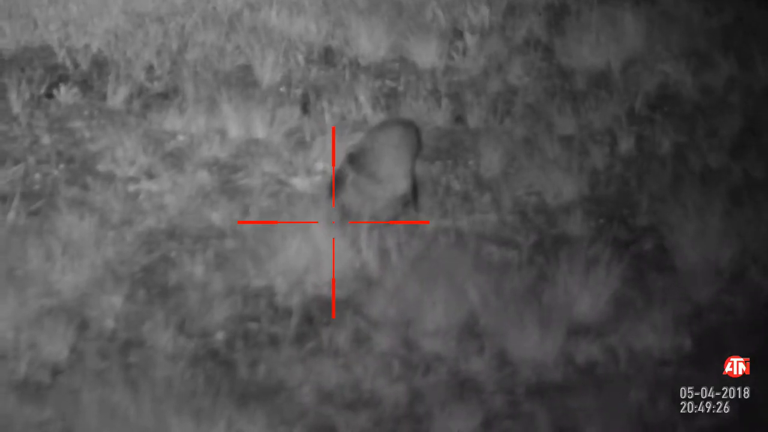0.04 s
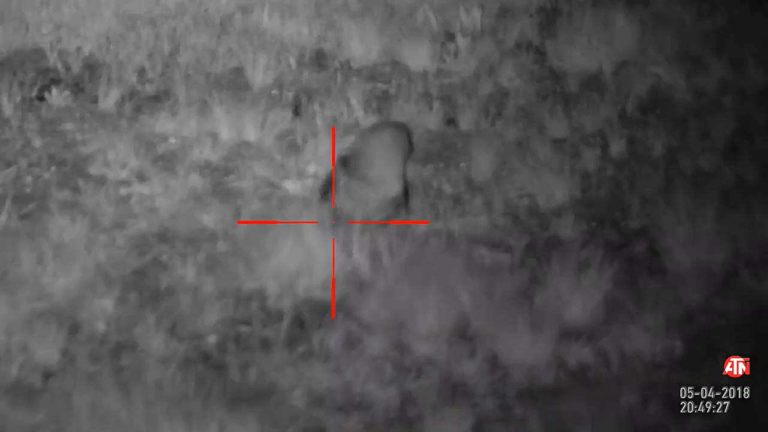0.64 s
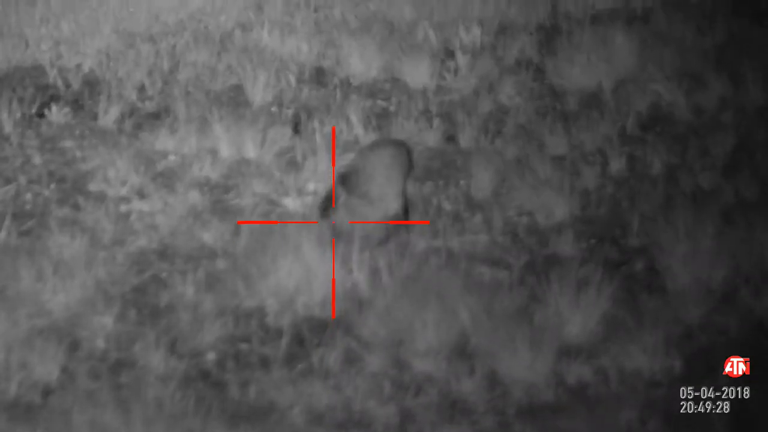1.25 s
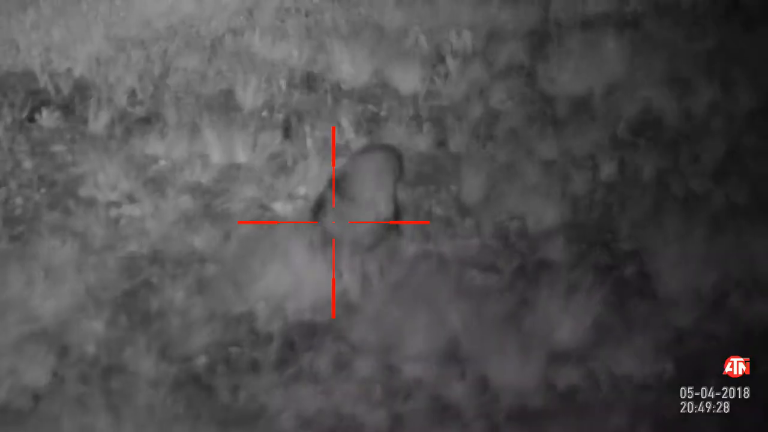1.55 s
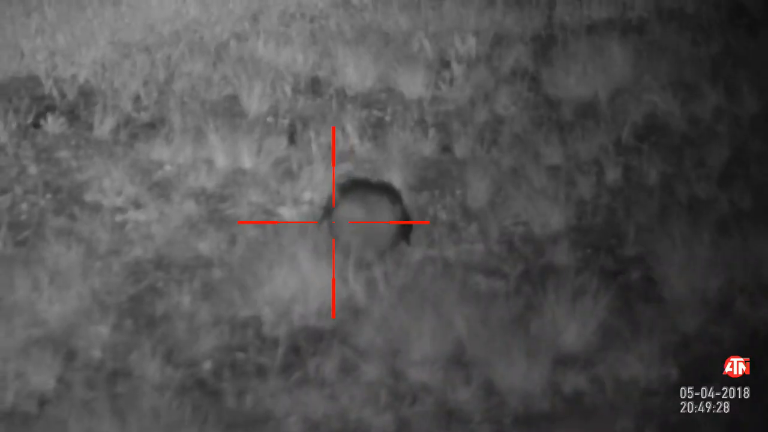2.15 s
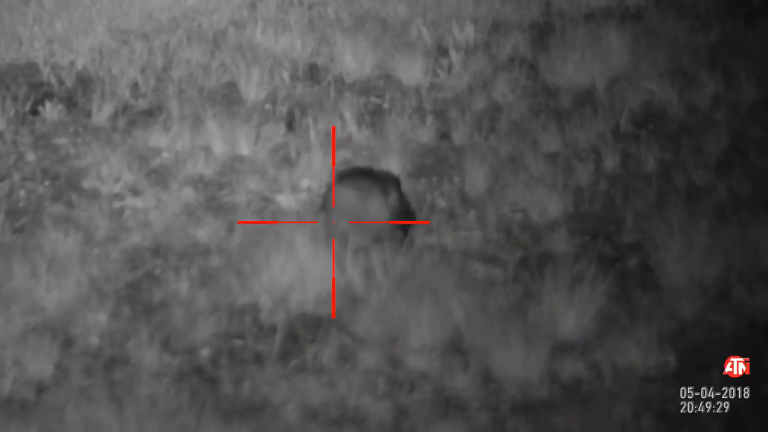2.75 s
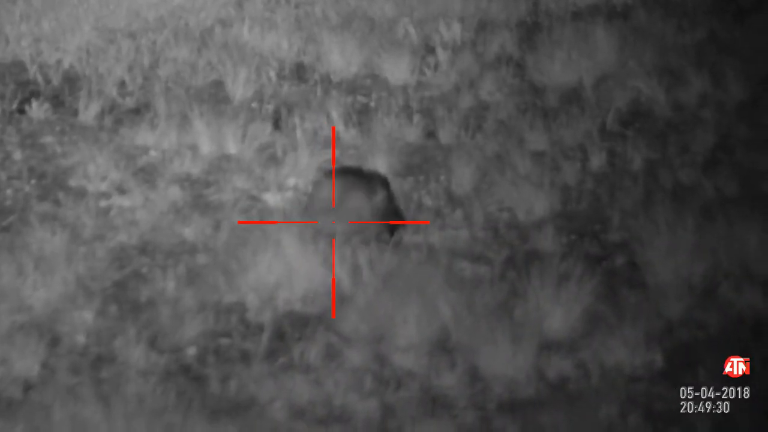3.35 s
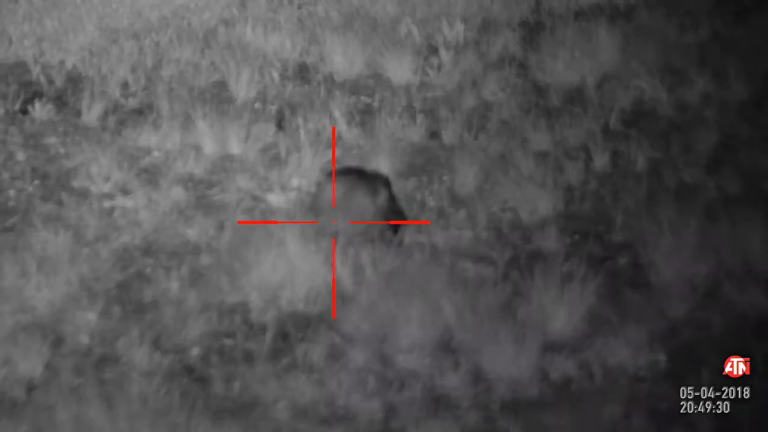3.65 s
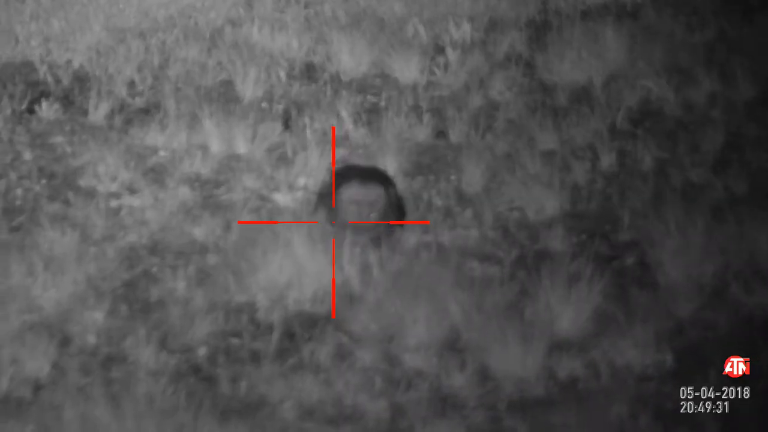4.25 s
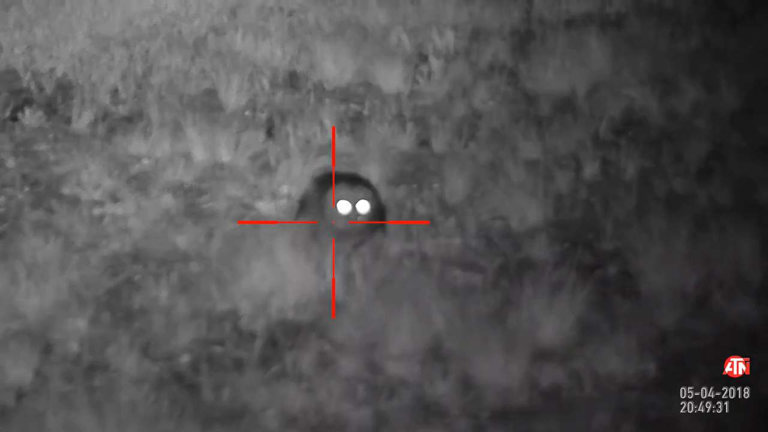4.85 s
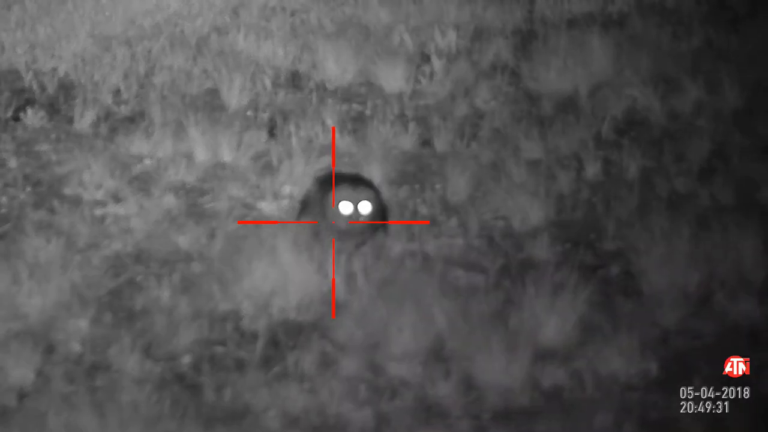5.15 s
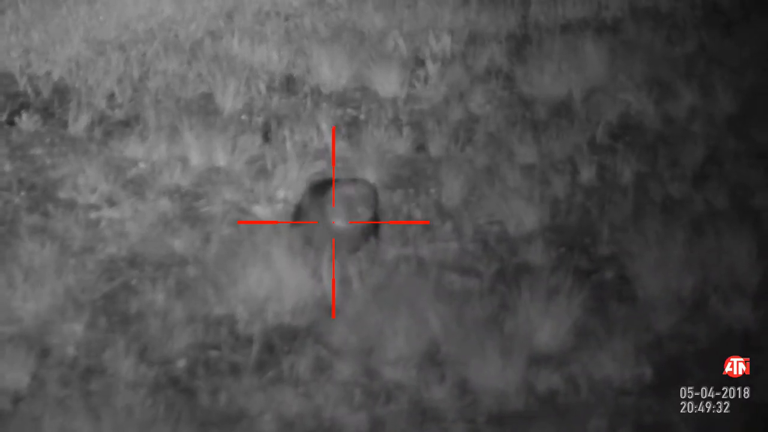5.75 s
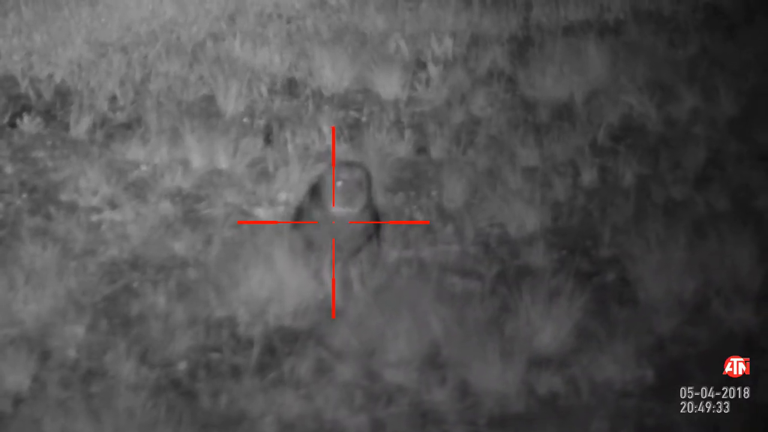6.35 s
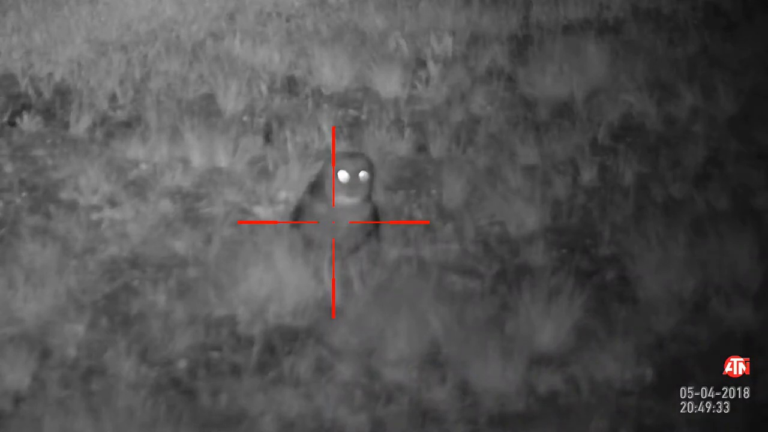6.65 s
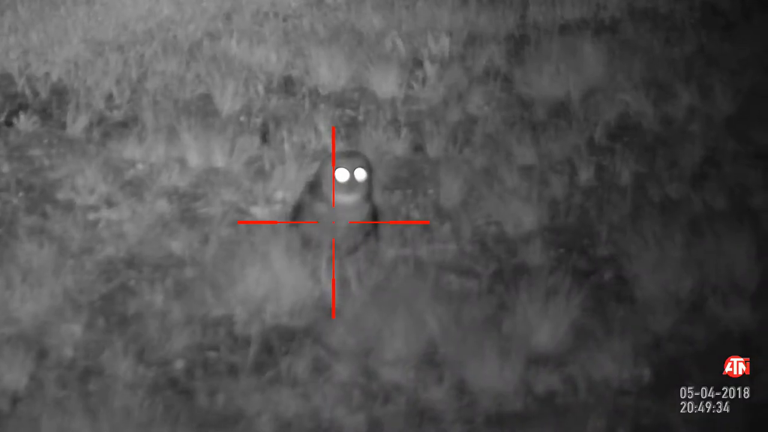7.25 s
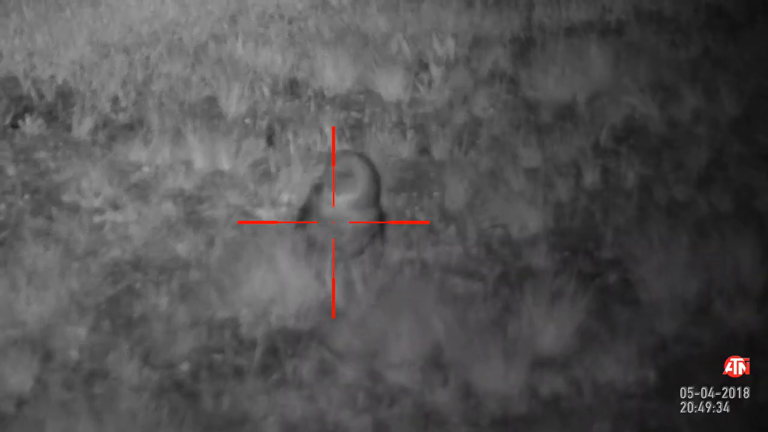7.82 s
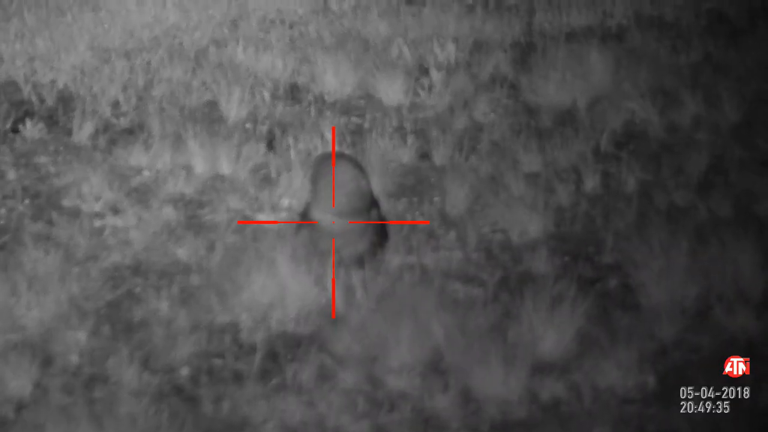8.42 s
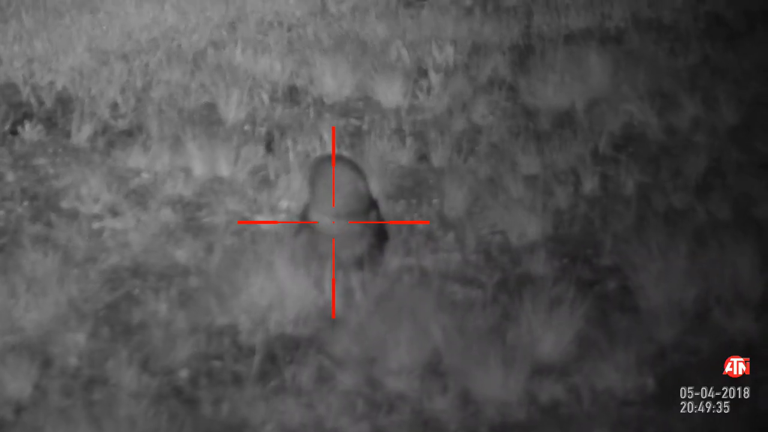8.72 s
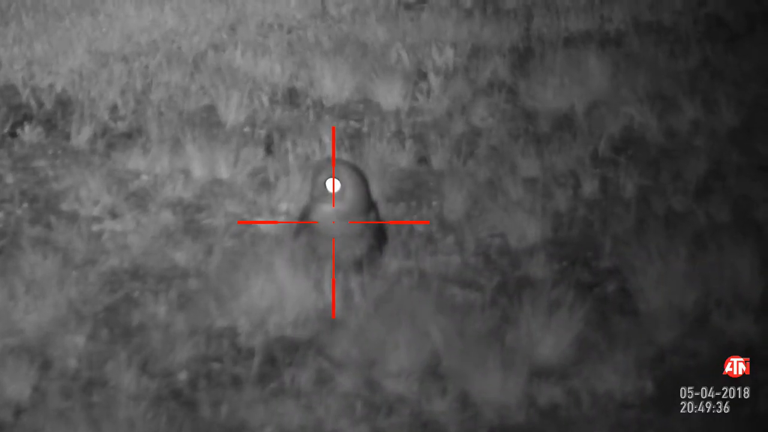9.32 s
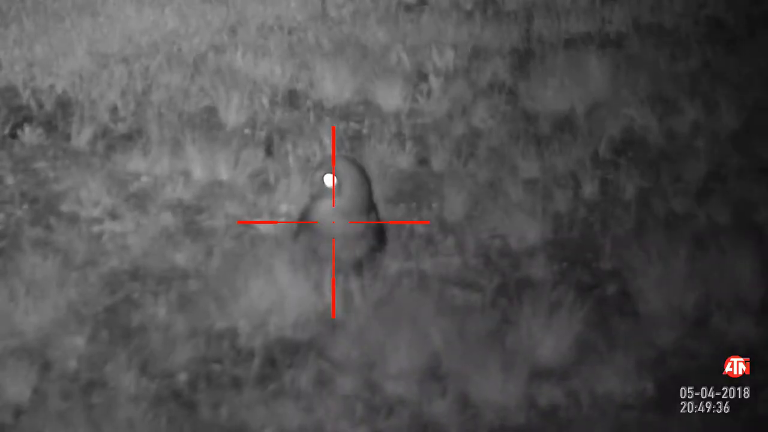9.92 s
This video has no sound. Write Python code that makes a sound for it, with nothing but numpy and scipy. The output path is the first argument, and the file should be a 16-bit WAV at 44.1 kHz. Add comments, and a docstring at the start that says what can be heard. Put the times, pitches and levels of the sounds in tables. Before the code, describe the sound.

Outdoors at night, many frogs call together from start to finish. Several high, whistled peeps sound each second over lower, rapidly pulsing trills that start and stop across one another at slightly different pitches. A far chorus fills the gaps, so the level stays fairly even. The calls scatter softly off trees and banks, and the small microphone, set back from the water, adds a faint hiss, hum and high sizzle.

```python
"""A pond at night, heard from some way off through a small camera's microphone.
Tree frogs trill in overlapping trains of short rising pulses, each a push of air radiated by the
throat sac. Peepers whistle upward above them; a distant chorus blurs into a wash. Trunks and banks
scatter the calls. The camera adds faint hiss, hum and a thin high sizzle."""
import sys
import numpy as np
from scipy import signal
from scipy.fft import rfft, irfft, next_fast_len
from scipy.io import wavfile
from scipy.ndimage import uniform_filter1d

SR = 44100
rng = np.random.default_rng(int(sys.argv[2]) if len(sys.argv) > 2 else 0)


def pcm_store(signal):
    """Save signal as 16-bit PCM."""
    levels = np.round(np.clip(np.atleast_2d(signal), -1, 1) * 32767)
    wavfile.write(sys.argv[1], SR, levels.astype(np.int16).T)


N = 440118
TIME_S = np.arange(N) / SR

# mic hiss, common to both channels: f/Hz, relative density/dB
HISS_SPECTRUM = [(20, 6), (50, -5.5), (100, -11.5), (250, -14), (800, -14), (5000, -13), (8000, -16),
                 (10500, -20.5), (12400, -14.5), (13500, -17), (16000, -16)]
# mic hiss, side against common part: f/Hz, gain/dB
HISS_SIDE_GAIN = [(20, -2.5), (120, -3.5), (400, -4.5), (1000, -19), (3500, -45), (5000, -8), (10000, -2),
                  (14000, -4.5), (16000, -20)]
# electronics hum: f/Hz, rms level/dB
HUM_LINES = [(360, -91), (600, -90.5), (720, -82)]
# long gaps in the sizzle: start/s, end/s
SIZZLE_GAPS = [(.04, .23), (.43, .51), (2.84, 3.0), (3.69, 3.75), (7.7, 7.97)]
# most distant frogs: f/Hz, relative density/dB
WASH_SPECTRUM = [(800, -39.5), (950, -24.5), (1150, -11), (1400, -12.5), (1600, -23.5), (1850, -18.5),
                 (2050, -11.5), (2300, -1), (2650, -15.5), (3000, -7), (3300, -16), (3700, -22.5),
                 (4500, -29.5), (5300, -41.5)]
# far chorus swell: t/s, relative fundamental level/dB, relative 2nd-partial level/dB
CHORUS_SWELL = [(0.04, -44.5, -32.5), (0.29, -49.5, -35), (1.75, -45.5, -34), (2.17, -48, -39),
                (2.58, -52, -39.5), (2.97, -46, -35.5), (4.22, -45, -33.5), (5.16, -52.5, -38),
                (5.63, -44, -34.5), (5.69, -47, -36), (6.13, -47, -37.5), (6.6, -44, -31),
                (7.63, -49, -35.5), (8.18, -49, -33.5), (9.34, -46, -37.5), (9.4, -50, -39),
                (9.95, -46.5, -37), (9.98, -53, -35)]
# peeper timbre, one row a voice: levels of partials 3-9/dB re partial 2
PEEPER_OVERTONES = [(-23.5, -30, -31.5, -33, -43, -43, -23), (-32, -26, -44, -46, -46, -32, -48),
                    (-33.5, -37.5, -46, -40, -38.5, -39, -50)]
# near peepers: length/s, final f/Hz, relative level/dB, echo lag/s, voice row, peep times/s
NEAR_PEEPERS = [(.2, 3034, -42.8, .0044, 0, [.661, 1.787, 2.882, 4.853, 5.855, 6.905, 7.848, 8.782, 9.776]),
                (.22, 3036, -45, .0007, 1, [.08, 1.245, 2.26, 3.263, 4.578, 5.622, 6.65, 7.555]),
                (.1, 3110, -40.5, .00066, 2, [.105, .97, 1.8, 2.591, 3.54, 4.41, 5.35, 6.345, 7.297, 8.142, 9.05]),
                (.115, 3335, -47.5, 0.00067, 2, [0, 1.5, 1.8, 2.5, 4, 4.139, 4.5, 5.98, 7.5, 8, 9, 10]),
                (.1, 3130, -44.5, .00066, 2, [.04, .389, 1.431, 2.213, 2.775, 3.97, 4.641, 5.2, 7.07, 7.87, 8.933, 9.757]),
                (.1, 3070, -46, 0.00061, 2, [1.636, 2.45, 4.28, 5.47, 6.2, 7.7, 8.42, 9.14, 9.601])]
# tree frog throat sac response: f/Hz, gain/dB
SAC_RESPONSE = [(850, -5), (1000, -1), (1150, -1.5), (1350, -1.5), (1600, -12), (1850, -6), (2100, -1),
                (2400, 0), (2700, -5), (3300, -25.5), (4400, -32), (5400, -46), (7500, -41.5), (12000, -46)]
# near tree frog trills: start/s, end/s, pulse rate/Hz, f/Hz, relative level/dB, relative rasp/dB
NEAR_TRILLS = [(0.010, 2.350, 16.8, 1130, -39, -64), (0.033, 0.78, 13.5, 1266, -40, -56.5),
               (0.031, 1.478, 16.6, 1233, -41, -70), (0.365, 2.02, 17.8, 1066, -39.5, -72),
               (0.767, 2.35, 18.7, 1130, -41.5, -73), (1.058, 1.92, 18.3, 1062, -42, -72),
               (1.414, 2.77, 21.2, 1130, -42, -72), (2.447, 3.56, 20.0, 1029, -42, -59.5),
               (2.653, 3.76, 19.1, 1298, -44, -69), (3.153, 4.4, 17.5, 1096, -40.5, -64),
               (3.236, 5.03, 19.9, 1164, -41, -60.5), (3.265, 4.08, 17.5, 1093, -38.5, -73),
               (3.901, 5.26, 20.5, 1198, -37, -71), (4.730, 5.780, 20.0, 882, -52, -78),
               (4.786, 6.6, 18.2, 1131, -46, -64.5), (5.269, 6.55, 18.8, 1263, -41.5, -63),
               (5.374, 6.54, 14.5, 1232, -35.5, -64), (5.686, 6.86, 18.8, 1237, -39.5, -62),
               (5.923, 7.333, 17.0, 1097, -36.3, -58), (6.937, 9.04, 19.5, 1165, -41.5, -68),
               (7.155, 8.62, 21.1, 965.4, -43, -71), (7.411, 8.9, 20.8, 1129, -41, -65.5),
               (7.637, 9.119, 16.7, 1265, -42.5, -72), (7.727, 9.5, 18.4, 1131, -44, -73),
               (7.950, 9.315, 17.6, 1062, -37.5, -66), (8.416, 10.1, 17.5, 1064, -37.5, -67)]


def from_db(db):
    return 10 ** (np.asarray(db) / 20)


def unit_rms(x):
    return x / np.sqrt(np.mean(x ** 2) + 1e-20)


def gain_db(spectrum, hz):
    f, db = np.transpose(spectrum)
    return np.interp(np.log(np.maximum(hz, 1)), np.log(f), db)


def coloured(x, spectrum):
    size = next_fast_len(N)
    hz = np.arange(size // 2 + 1) * SR / size
    return irfft(rfft(x, size) * from_db(gain_db(spectrum, hz)), size)[:N]


def noise(spectrum):
    return unit_rms(coloured(rng.standard_normal(N), spectrum))


def drift(rate_hz, hop=16):
    """Random wander, rms about 1."""
    lowpass = signal.butter(2, rate_hz * hop, fs=SR, output="sos")
    slow = unit_rms(signal.sosfilt(lowpass, rng.standard_normal((N + SR) // hop)))
    return np.interp((np.arange(N) + SR // 2) / hop, np.arange(len(slow)), slow)


def evened(x):
    """Slow swells flattened, rms about 1."""
    power = uniform_filter1d(x ** 2, SR // 2)
    return x / np.sqrt(power + .043 * power.mean())


def add(track, sound, at_s):
    at = int(round(at_s * SR))
    lo, hi = max(at, 0), min(at + len(sound), N)
    if hi > lo:
        track[lo:hi] += sound[lo - at:hi - at]


def scatter(sound, wet_db, t60_s):
    """Direct sound plus sparse, dying echoes off trunks and banks; energy kept."""
    t = np.arange(int(t60_s * SR)) / SR
    path = rng.standard_normal(len(t)) * (rng.random(len(t)) < .02) * from_db(-60 * t / t60_s)
    path *= from_db(wet_db) / np.linalg.norm(path)
    path[0] = 1
    heard = signal.fftconvolve(sound, path)
    return heard * np.linalg.norm(sound) / np.linalg.norm(heard)


def ground_echo(sound, lag_s, echo_db=-8):
    """One dull echo off ground or bank; interference makes a glide swell and dip."""
    lag = np.zeros(int(round(lag_s * SR)))
    both = np.r_[sound, lag] + from_db(echo_db) * np.r_[lag, uniform_filter1d(sound, size=3)]
    return both * np.linalg.norm(sound) / np.linalg.norm(both)


def sizzle(centre_hz=14620, level_db=-62.5, flutter_db=3.5, dropouts_per_s=2.7, dropout_s=.04):
    """Thin high whine; flutters in pitch and level, keeps cutting out."""
    gate = np.ones(N)
    dropouts = [(s, s + dropout_s) for s in TIME_S[rng.random(N) < dropouts_per_s / SR]]
    for start_s, end_s in SIZZLE_GAPS + dropouts:
        gate[(TIME_S > start_s) & (TIME_S < end_s)] = 0
    hz = centre_hz + 260 * drift(rate_hz=300) + 110 * drift(rate_hz=20)
    level = from_db(level_db + flutter_db * drift(rate_hz=120)) * uniform_filter1d(gate, SR // 100)
    return level * np.sqrt(2) * np.sin(2 * np.pi * np.cumsum(hz) / SR)


def camera_noise(hiss_db=-61.5):
    """Stereo mic hiss, electronics hum and sizzle."""
    hiss = noise(HISS_SPECTRUM) + coloured(noise(HISS_SPECTRUM), HISS_SIDE_GAIN) * np.array([[1], [-1]])
    hum = sum(from_db(db) * np.sqrt(2) * np.sin(2 * np.pi * hz * TIME_S) for hz, db in HUM_LINES)
    return from_db(hiss_db) * hiss + hum + sizzle()


def chorus_swell_db():
    """Far chorus level curves: fundamental, 2nd partial."""
    times_s, *levels_db = np.transpose(CHORUS_SWELL)
    return [np.interp(TIME_S, times_s, db) for db in levels_db]


def distant_wash(trim_db=-9.5):
    """The farthest frogs, blurred to noise that swells with the chorus."""
    _, swell_db = chorus_swell_db()
    return from_db(swell_db + trim_db) * noise(WASH_SPECTRUM)


def peep(length_s, top_hz, overtones_db, brighten_db=11.5, flutter_db=2.5):
    """Whistle on partial 2: slides up, brightens, levels off. Longer peeps start lower."""
    u = np.linspace(0, 1, int(length_s * SR))
    hz = top_hz * (1 - .275 * np.sqrt(length_s) * (1 - u) ** 1.7)
    phase = np.pi * np.cumsum(hz) / SR   # of the silent fundamental, hz / 2
    partials_db = [0] + [db + brighten_db * (u - .5) for db in overtones_db]
    call = 0
    for k, db in enumerate(partials_db, 2):
        flutter = np.interp(u, np.linspace(0, 1, 9), rng.standard_normal(9))
        call += from_db(db + flutter_db * flutter) * np.sin(k * phase)
    envelope = np.sqrt(np.abs(np.sin(np.pi * u ** .8)))
    return envelope * call


def far_peepers(peeps=170, level_db=-46, centre_hz=3135, spread_hz=200):
    """Random peeps blurred by distance; higher ones are softer."""
    out = np.zeros(N)
    for slot, (when, length, pitch) in enumerate(rng.random((peeps, 3))):
        top_hz = centre_hz + spread_hz * (2 * pitch - 1)
        call = peep(.08 + .0601 * length, top_hz, PEEPER_OVERTONES[2][:2])
        at_s = (slot + 2 * when - 2) / peeps * N / SR
        add(out, from_db(-6 * pitch) * scatter(call, wet_db=0, t60_s=.26), at_s)
    return from_db(level_db) * evened(out)


def air_pulse(pitch_hz, length_s=.029, sweep=.277):
    """One push of air: swells, rises in pitch, dies."""
    u = np.linspace(-.5, .5, int(length_s * SR))
    envelope = np.abs(np.cos(np.pi * u)) ** 1.32
    hz = pitch_hz * (1 + sweep * u)
    phase = 2 * np.pi * np.cumsum(hz) / SR
    return envelope, hz, phase


def trill_beats(start_s, end_s, rate_hz, slowing=.045, uneven_db=1.17):
    """Pulse times and gains of a trill: soft onset, sagging rate."""
    count = max(int(round((end_s - start_s) * rate_hz)), 1)
    elapsed = np.r_[0, np.cumsum(1 / np.linspace(1, 1 - slowing, count))]
    times_s = start_s + elapsed * (end_s - start_s) / elapsed[-1]
    levels_db = rng.normal(0, uneven_db, count + 1) - 3 * np.exp(-np.arange(count + 1))
    return zip(times_s, from_db(levels_db))


def far_tree_frogs(frogs=9, centre_hz=1160, spread=.0756, low_trim_db=-3.5, high_trim_db=-4):
    """Each frog trills and rests in its own time; partials 1 (low) and 2 (high) only."""
    low, high = np.zeros(N), np.zeros(N)
    for detune in np.linspace(-spread, spread, frogs):
        envelope, _, phase = air_pulse(centre_hz * (1 + detune))
        pulses = [scatter(envelope * np.sin(k * phase), wet_db=-1, t60_s=.14) for k in (1, 2)]
        rate_hz, start_s = rng.uniform(15, 20.3), rng.uniform(-3, 0)
        while start_s < N / SR:
            end_s = start_s + rng.uniform(1.2, 2.1)
            for at_s, gain in trill_beats(start_s, end_s, rate_hz):
                add(low, gain * pulses[0], at_s)
                add(high, gain * pulses[1], at_s)
            start_s = end_s + rng.uniform(.4, 1.2)
    low_db, high_db = chorus_swell_db()
    return from_db(low_db + low_trim_db) * evened(low) + from_db(high_db + high_trim_db) * evened(high)


def near_peepers(trim_db=5.5, uneven_db=.64, waver_hz=8):
    """Six peepers, each repeating its own peep about once a second."""
    out = np.zeros(N)
    for length_s, top_hz, db, lag_s, voice, times_s in NEAR_PEEPERS:
        for at_s in times_s:
            call = peep(length_s, top_hz + rng.normal(0, waver_hz), PEEPER_OVERTONES[voice])
            heard = scatter(ground_echo(call, lag_s), wet_db=-7.5, t60_s=.21)
            add(out, from_db(db + trim_db + rng.normal(0, uneven_db)) * heard, at_s)
    return out


def sac_pulse(pitch_hz, fundamental_db, overtone_db, rasp_hz, rasp_db, rasp_halfwidth_hz=520):
    """The throat sac radiates mostly partial 2; a high resonance adds rasp."""
    envelope, hz, phase = air_pulse(pitch_hz)
    voice = from_db(fundamental_db + gain_db(SAC_RESPONSE, hz)) * np.sin(phase)
    for k in range(2, 10):
        rasp = from_db(rasp_db) / (1 + ((k * hz - rasp_hz) / rasp_halfwidth_hz) ** 2)
        voice += (from_db(overtone_db + gain_db(SAC_RESPONSE, k * hz)) + rasp) * np.sin(k * phase)
    return envelope * voice


def near_tree_frogs(trim_db=8, rasp_trim_db=-.2, typical_hz=1114, jitter=.021, variants=4):
    """Pitch sets each frog's timbre. Pulses vary slightly, so their echoes sum differently."""
    out = np.zeros(N)
    for start_s, end_s, rate_hz, pitch_hz, db, rasp_db in NEAR_TRILLS:
        ratio = pitch_hz / typical_hz
        overtone_db = db + trim_db
        fundamental_db = overtone_db - 14 + 32 * np.log2(ratio)   # higher voices radiate more of it
        rasp_hz = 8030 * ratio ** .39
        pulses = [sac_pulse(hz, fundamental_db, overtone_db, rasp_hz, rasp_db + rasp_trim_db)
                  for hz in pitch_hz * (1 + np.linspace(-jitter, jitter, variants))]
        heard = [scatter(pulse, wet_db=-5, t60_s=.11) for pulse in pulses]
        half_pulse_s = len(pulses[0]) / SR / 2
        for at_s, gain in trill_beats(start_s, end_s, rate_hz):
            add(out, gain * heard[rng.integers(variants)], at_s - half_pulse_s)
    return out


def scene():
    """All frogs at one mic, same in both channels."""
    pond = distant_wash() + near_tree_frogs() + far_tree_frogs() + near_peepers() + far_peepers()
    return np.array([pond, pond])


def record(dry, cutoff_hz=15750):
    """Camera noise added, then a steep low-pass."""
    lowpass = signal.ellip(12, .1, 80, cutoff_hz, fs=SR, output="sos")
    return signal.sosfilt(lowpass, dry + camera_noise())


dry = scene()
out = record(dry)
pcm_store(out)
```